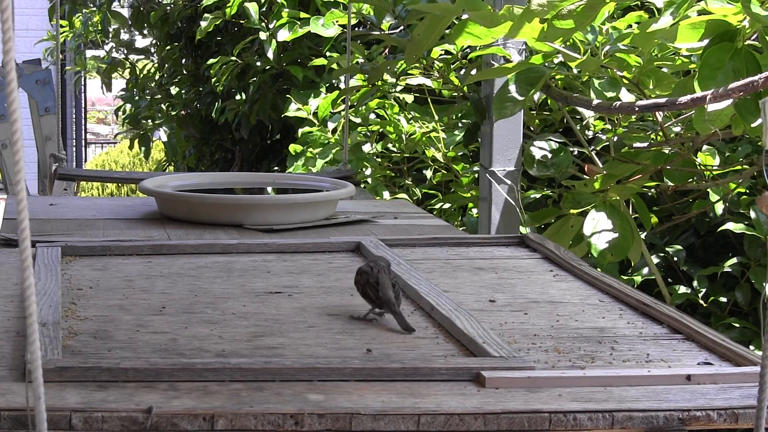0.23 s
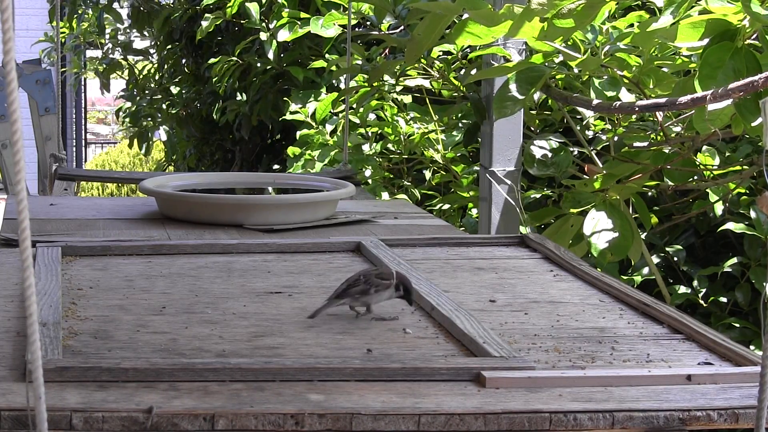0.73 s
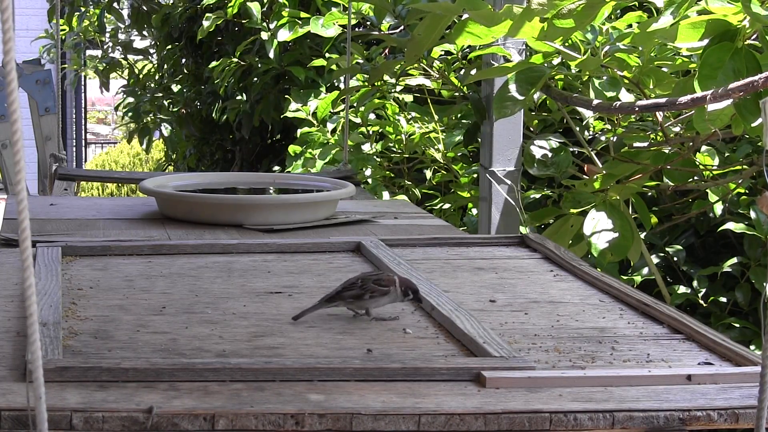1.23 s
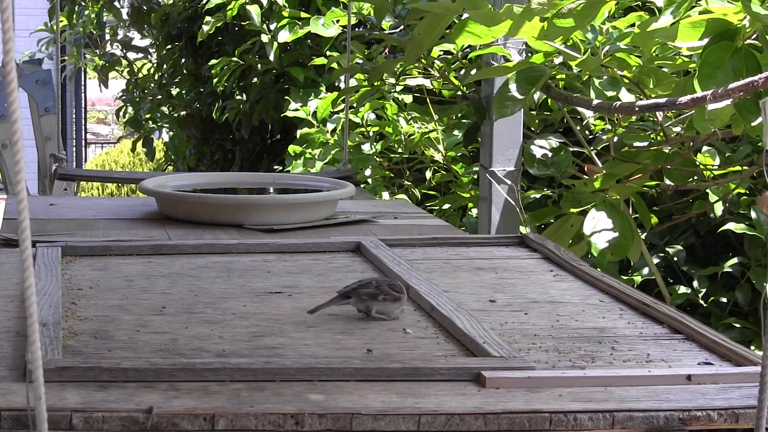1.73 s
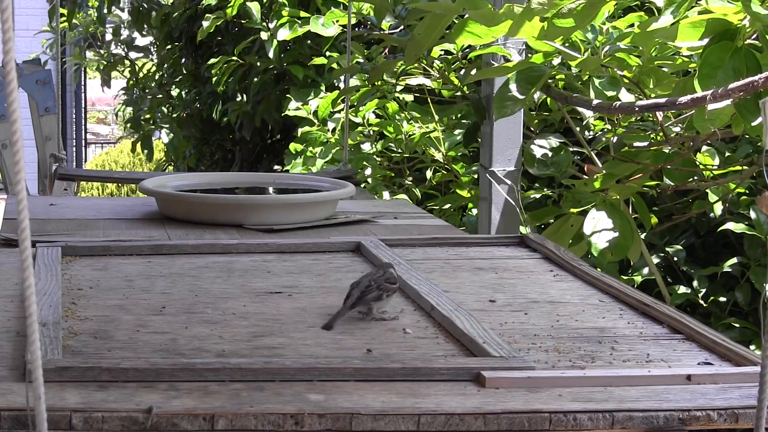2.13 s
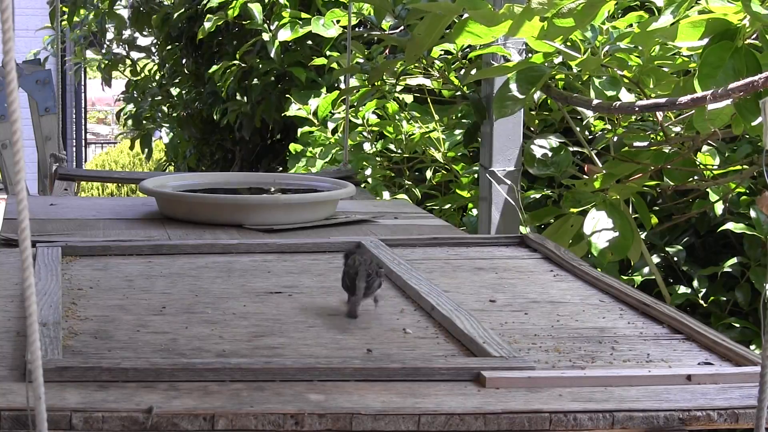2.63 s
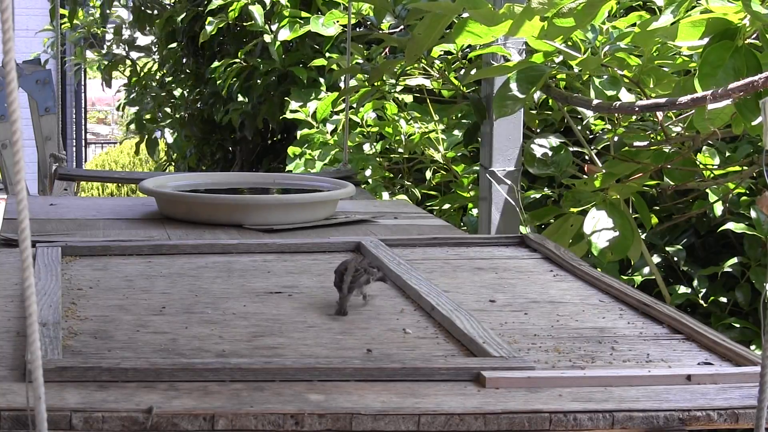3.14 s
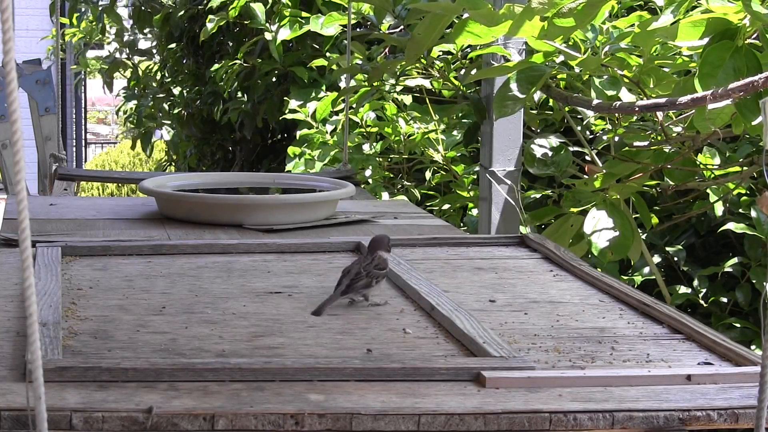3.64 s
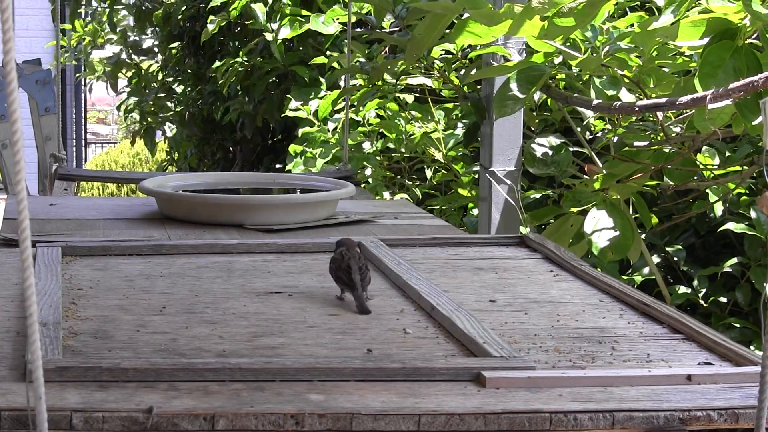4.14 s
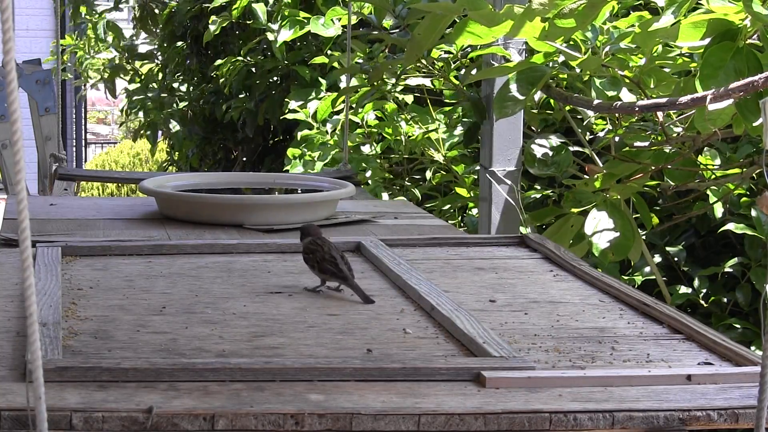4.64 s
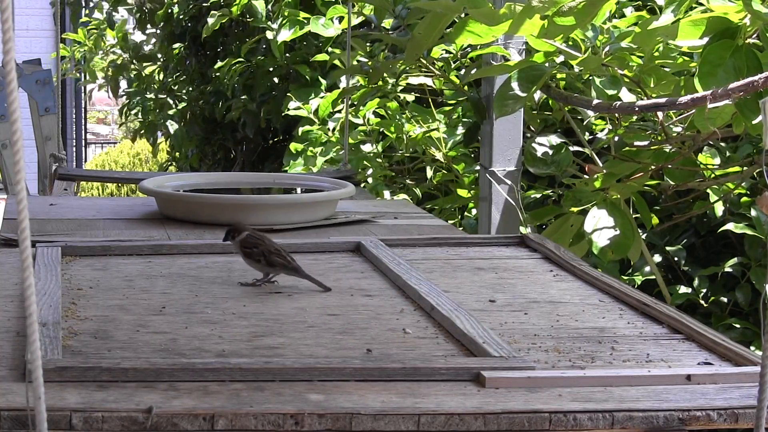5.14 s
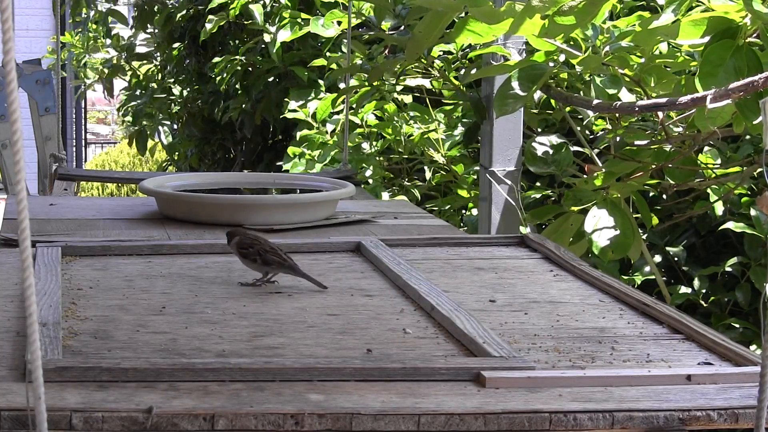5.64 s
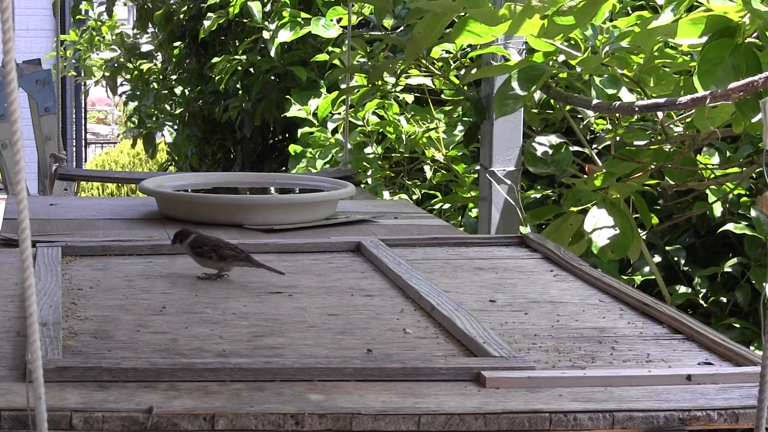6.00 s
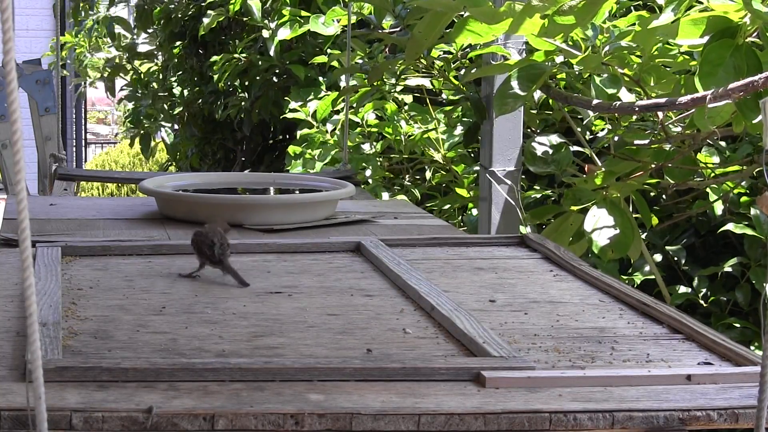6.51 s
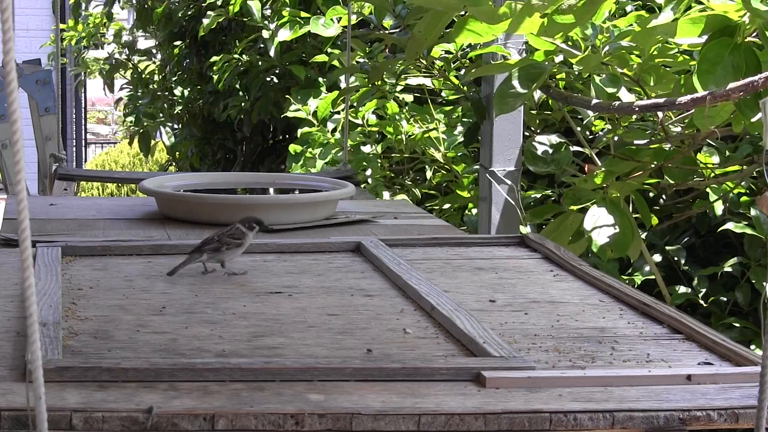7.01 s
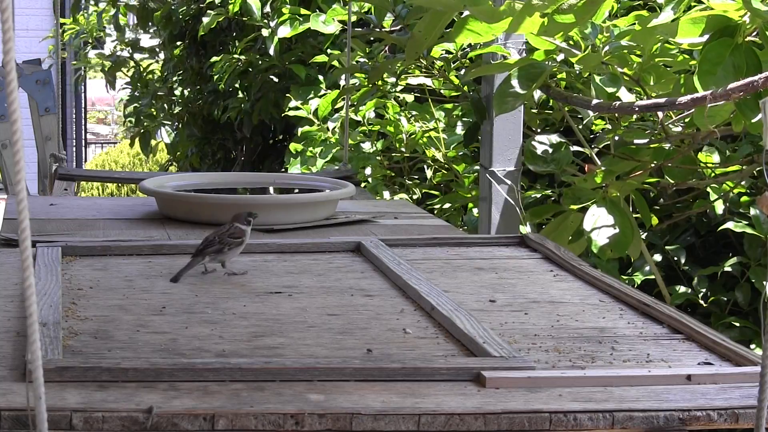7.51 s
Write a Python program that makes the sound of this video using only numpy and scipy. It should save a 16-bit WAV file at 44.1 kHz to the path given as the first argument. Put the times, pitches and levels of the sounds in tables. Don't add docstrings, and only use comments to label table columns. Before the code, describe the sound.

A sparrow close to the microphone chirps six times, alternating a longer raspy chirp with a shorter two-toned one, the first by far the loudest. Its claws and beak tick softly on a wooden board between calls. Fainter sparrows answer from a hedge and distant yards, with a brief scrape further off. Close walls give a short slap of echo over quiet town hum and leaf hiss.

```python
import sys
import numpy as np
from scipy import signal
from scipy.fft import rfft, irfft
from scipy.io import wavfile
from scipy.ndimage import uniform_filter1d, map_coordinates

SR = 44100
rng = np.random.default_rng(int(sys.argv[2]) if len(sys.argv) > 2 else 0)


def invert_db(level):
    return 10 ** (np.asarray(level, dtype=float) / 20)


def store_pcm(level_fs):
    pcm = np.round(np.clip(level_fs, -1, 1) * 32767).astype(np.int16)
    wavfile.write(sys.argv[1], SR, np.atleast_2d(pcm).T)


N = 342216

# (pitch [Hz], level [dB])
RUMBLE_COLOUR = [(20, -35), (34, -16), (48, -2), (62, -4.5), (80, -2.5), (130, -1.5), (200, -4.5),
                 (400, -38)]
# (time [s], level [dB])
ROAD_LEVEL = [
    (0, -63.5),
    (1.3, -64.5),
    (1.7, -62.5),
    (2.3, -63),
    (3.5, -63),
    (4.8, -61),
    (5.7, -59.5),
    (6.85, -58),
    (7.76, -58),
]
# (pitch [Hz], level [dB])
ROAD_COLOUR = [(120, -13.5), (280, 1), (400, -4.5), (800, -5), (1500, -10.5), (2100, -17.5), (4000, -32)]
# (time [s], level [dB])
BREEZE_LEVEL = [
    (0, -65.5),
    (.37, -71),
    (3.5, -70.5),
    (4.3, -66),
    (5.1, -65),
    (6, -67.5),
    (7.76, -66),
]
# (pitch [Hz], level [dB])
LEAF_COLOUR = [(800, -14.5), (2000, 1.5), (4000, 1), (8000, -5.5), (13000, -11), (16000, -17)]
# (pitch [Hz], likeness [0 to 1])
LIKENESS = [(60, 1), (180, 0.87), (550, 0.62), (1650, 0.72), (4970, 0.63), (15000, 0.59)]

# (pitch [Hz], time to fall 60 dB [s])
WALL_DECAY = [(300, 0.091), (1500, 0.21), (3500, 0.15), (6000, 0.2), (12000, 0.089)]
# (pitch [Hz], time to fall 60 dB [s])
YARD_DECAY = [(1000, .3), (4000, .48), (8000, 0.24)]
# (delay [s], level [dB])
FENCE_ECHOES = [(.0195, -14), (0.0077, -15.5)]

# (time [s], knock [dB], thud above the knock [dB], knock pitch [Hz])
CLAW_HOPS = [(.21, -53.5, -15.5, 2560), (.242, -55, -4, 937), (.803, -59, -9, 1770),
             (.821, -57, -18.5, 1045), (2.284, -48.5, -7.5, 1640), (3.977, -44.5, -9, 2588),
             (4.347, -41, 0, 2000), (4.604, -58, -15, 1110), (4.967, -39, -1, 1442), (4.975, -45, -9, 1170),
             (5.926, -48, 1, 1060), (6.38, -41, -4, 1390), (7.42, -52.5, -7.5, 830)]
# (time [s], knock [dB], thud above the knock [dB], knock pitch [Hz])
BEAK_PECKS = [(.855, -47.5, -12, 966), (1.562, -41.5, -15.5, 1080), (1.577, -43, -12, 840),
              (1.602, -42, -10, 1050), (1.765, -46.5, -7.5, 991), (3.016, -54.5, -18, 1240),
              (3.04, -42.5, -11, 1590), (3.334, -46.5, 1.5, 1700), (4.571, -55.5, -10, 1500),
              (5.219, -43.5, -7.5, 820), (5.993, -39.5, -3.5, 1180), (6.898, -41.5, 6.5, 2160)]
# (pitch [Hz], level [dB], time to fall 60 dB [s])
BOARD_RING = [(255.5, -0.5, 0.095), (298.4, -6, 0.17), (434, -6, 0.1)]
# (multiple of the knock pitch, level per Hz [dB])
KNOCK_COLOUR = [(.35, -23.5), (.7, -6.5), (1.02, -2), (1.5, -6.5), (2.4, -11.5), (4.5, -28)]
# (pitch [Hz], level per Hz [dB])
SCRATCH_COLOUR = [(2000, -3.5), (4000, 5.5), (8000, 2), (14000, -3.5), (16000, -6.5)]

# (start [ms], from [Hz], to [Hz], peak [dB], share of the stroke spent gliding [0 to 1])
LONG_STROKES = [(-10, 8100, 6800, -43, .7), (12.5, 4000, 4400, -17, .7), (16.5, 5200, 6100, -11, .8),
                (24.5, 6200, 6000, -10.5, .6), (28.5, 5800, 4250, -4, 0.8), (39, 5000, 3350, -8.5, .45),
                (48.5, 3450, 3500, -13, .5), (57.5, 3450, 4400, -4, .85), (65.5, 5000, 3350, 0.5, .65),
                (77.5, 4200, 2050, -3, .7), (84, 2100, 3200, -4, 0.7514), (96, 3100, 2100, -5, .8)]
# (start [ms], from [Hz], to [Hz], peak [dB], share of the stroke spent gliding [0 to 1])
SHORT_STROKES_A = [(15, 1850, 2300, -13, .6), (18.5, 2300, 4100, -14, .9), (27.06, 4100, 3900, -6, 0.91),
                   (34.01, 3900, 2250, -7, .9), (39, 2500, 3900, -2.5, .65), (49.02, 3800, 4200, -2.5, .7),
                   (54.17, 3700, 3150, -5, .9), (59, 2900, 3950, -5, .8), (63.5, 3950, 3400, -5, .7),
                   (66.9, 3650, 3720, -2.5, .5), (73.5, 3900, 1750, 0.5, .85)]
# (start [ms], from [Hz], to [Hz], peak [dB], share of the stroke spent gliding [0 to 1])
SHORT_STROKES_B = [(14.94, 3200, 3500, -18.5, .7), (20.015, 3500, 4900, -15.5, 0.599),
                   (30.32, 4500, 4850, -11.5, 0.57), (39.66, 3600, 4400, -2, 0.99),
                   (47.1, 4400, 3500, -3.5, .85), (54.9, 3500, 2750, -2.5, .8), (66.5, 2700, 1750, -5, .9),
                   (75, 1750, 1300, -6, .8)]
# (time [s], then effort at four even moments [dB])
LONG_CHIRPS = [
    (.34, -3, -9, -10, -8),
    (3.786, -15, -14, -13.5, -15),
    (6.528, -11, -13.5, -13.5, -14),
]
# (time [s], then effort at four even moments [dB])
SHORT_CHIRPS = [
    (2.655, -12.5, -16, -16.5, -21),
    (5.27, -20, -21.5, -20, -20.5),
    (7.6519, -11.5, -13, -15, -20.5),
]
# (time [s], left over right [dB], overtones [dB], low notes [dB], wall echo [dB])
PERCH_TURNS = [
    (.34, 3.5, 0, -2, -9),
    (2.655, 2.5, 0.5, -2, -4.5),
    (3.7875, 1.9, 4, -1, -4),
    (5.2705, 2.47, 5, -4.5, -4),
    (6.528, 2, 4, -2.5, -1.5),
    (7.6525, 2.62, 1.5, -2.5, -5),
]
# (pitch [Hz], level [dB])
HALF_PITCH = [(2000, -28), (2500, -16.5), (3000, -19), (3400, -39), (4500, -21), (5500, -45.5)]
# (pitch [Hz], level [dB])
THROAT_PASS = [(1300, -18.5), (2100, -15), (2800, -3), (3500, 0.5), (4500, -0.5), (6200, -4.5)]
# (pitch [Hz], level per Hz [dB])
RASP_COLOUR = [(1500, -24), (3000, -8), (5000, 2.5), (6500, -1), (8000, -7), (10000, -10.5), (13000, -19),
               (16000, -29)]

# (time [s], length [s], from [Hz], to [Hz], level [dB])
FAR_GLIDES = [
    (0, 0.0247, 5580, 6330, -4),
    (0.01, .028, 6000, 4310, -3),
    (0.029, .032, 4500, 3480, 0.5),
    (.056, .04, 3450, 4400, -2.5),
]
# (time [s], level [dB], length factor)
FAR_CHIRPS = [
    (1.588, -47, .9),
    (3.968, -48.5, 1.15),
]
# (time [s], length [s], from [Hz], to [Hz], level [dB])
FAINT_GLIDES = [
    (2.086, .039, 3700, 3300, -62.5),
    (2.153, .04, 2660, 2730, -65),
    (2.247, .05, 3980, 3600, -65.5),
    (2.29, .04, 3700, 3650, -73),
]
# (time [s], length [s], from [Hz], to [Hz], level [dB])
HEDGE_GLIDES = [(4.72, .02, 6500, 7000, -58), (5.592, 0.035, 3650, 2380, -50),
                (5.612, 0.0435, 2260, 2590, -54), (5.645, .028, 2513, 3332, -49),
                (5.65, 0.02685, 3270, 4123, -50), (5.65, .025, 1469, 2000, -54),
                (7.042, 0.0266, 3156, 2384, -51.5), (7.065, 0.036, 2414, 3300, -53),
                (7.092, 0.029, 3200, 3490, -51.5), (7.096, 0.022, 3886, 4100, -60),
                (7.418, 0.024, 7600, 7300, -56)]

# (pitch [Hz], level per Hz [dB])
SCRAPE_COLOUR = [(250, -4.5), (500, -1.5), (1100, -10), (1800, -5), (2400, -11.5), (3200, -19),
                 (6000, -36.5)]
# (time [s], firing rate [Hz], level [dB])
CAR_PASS = [
    (2.6, 31.8, -86),
    (2.9, 35.17, -69.5),
    (3.15, 43.11, -55.5),
    (3.35, 49.08, -65),
    (3.45, 40.9, -68),
    (3.8, 39, -56),
    (4.3, 39, -70),
    (4.6, 37.6, -60.5),
    (5, 37.58, -101),
]
# (multiple of the firing rate, level [dB])
ENGINE_ORDERS = [(2, -1.5), (3, -1.5), (4, -14)]

LONG_END_MS, SHORT_END_MS = 106.7, 91
# start, full, fading, end [ms], level [dB]
LONG_AIR, SHORT_AIR = (-16, 30, 95, 112.5, -34), (8.5, 20, 78, 92, -30)


def unit(x):
    return x / np.sqrt(np.mean(x ** 2) + 1e-20)


def along(points, hz):
    f, v = np.transpose(points)
    return np.interp(np.log(hz + 1), np.log(f + 1), v)


def curves(rows, t):
    s, *cols = np.transpose(rows)
    return [np.interp(t, s, c, left=c[0], right=c[-1]) for c in cols]


def wobble(rate, size):
    knots = rng.standard_normal(int(size * rate / SR) + 4)
    return map_coordinates(knots, [np.arange(size) * rate / SR])


def noise(spectrum, size, alike=None):
    hz = np.fft.rfftfreq(size, 1 / SR)
    colour = invert_db(along(spectrum, hz) - 60 * (hz < spectrum[0][0] / 2))
    a, b = rfft(rng.standard_normal((2, size))) * colour
    if alike is None:
        return unit(irfft(a, size))
    turn = np.arccos(np.clip(along(alike, hz), -1, 1)) / 2
    left = np.cos(turn) * a + np.sin(turn) * b
    right = np.cos(turn) * a - np.sin(turn) * b
    return unit(irfft([left, right], size))


def add(out, s, x):
    part = out[:, round(s * SR):][:, :x.shape[1]]
    part += x[:, :part.shape[1]]


def echoed(x, decay, delay_s, alike):
    hz, t, z = signal.stft(rng.standard_normal((2, SR // 2)), SR, nperseg=128)
    fading = z * invert_db(-60 * t / along(decay, hz)[:, None])
    a, b = signal.istft(fading, SR, nperseg=128)[1]
    side = np.sqrt(np.clip((1 - alike) / (1 + alike), 0, 1))
    tail = np.array([a + side * b, a - side * b])
    tail = tail / np.sqrt(np.sum(tail ** 2) / 2)
    tail = np.pad(tail, ((0, 0), (round(delay_s * SR), 0)))
    return signal.fftconvolve(x[None], tail, axes=1)


def voice(hz, db, half_db, flutter, shiver_db):
    smooth_hz, smooth_db = uniform_filter1d(hz, size=45), uniform_filter1d(db, size=45)
    turn = 2 * np.pi * np.cumsum(smooth_hz * (1 + flutter * wobble(700, len(hz)))) / SR
    tone = np.sin(turn) + invert_db(half_db) * np.sin(turn / 2)
    return invert_db(smooth_db + shiver_db * wobble(450, len(hz))) * tone


def town():
    t = np.arange(N) / SR
    (road_db,), (leaf_db,) = curves(ROAD_LEVEL, t), curves(BREEZE_LEVEL, t)
    pass_s, pass_lasts_s = 3.6, 0.4
    rumble_db = -61 + 2.5 * np.exp(-((t - pass_s) / pass_lasts_s) ** 2)
    rumble = invert_db(rumble_db + 0.81 * wobble(5, N)) * noise(RUMBLE_COLOUR, N, LIKENESS)
    road = invert_db(road_db + 3 + 0.68 * wobble(7, N)) * noise(ROAD_COLOUR, N, LIKENESS)
    leaves = invert_db(leaf_db + 5.5 + 0.393 * wobble(5, N)) * noise(LEAF_COLOUR, N, LIKENESS)
    return (rumble + road + leaves) * invert_db([[-.4], [.4]])


def motor_whine():
    t = np.arange(N) / SR
    stops_s, fade_db_per_s = 4.9, 80
    db = -83 - fade_db_per_s * np.clip(t - stops_s, 0, None)
    return invert_db(db + 1.5 * wobble(12, N)) * np.sin(2 * np.pi * 12769 * t)


def taps():
    out, t = np.zeros((2, N)), np.arange(SR // 6) / SR
    claw_db, beak_db = -54.5, -61.5
    contacts = [(*row, claw_db) for row in CLAW_HOPS] + [(*row, beak_db) for row in BEAK_PECKS]
    for s, db, thud_db, knock_hz, scratch_db in contacts:
        scratch = invert_db(scratch_db - db - 60 * t / 0.06) * noise(SCRATCH_COLOUR, len(t))
        knock = invert_db(-4.5 - 60 * t / .06) * noise(np.multiply(KNOCK_COLOUR, (knock_hz, 1)), len(t))
        ring = sum(invert_db(level + rng.normal(0, 0.86) - 60 * t / t60) * np.sin(2 * np.pi * hz * t)
                   for hz, level, t60 in BOARD_RING)
        thud = invert_db(thud_db) * (1 - np.exp(-t / .004)) * ring
        x = invert_db(db - 1) * (1 - np.exp(-t / .0007)) * (scratch + knock + thud)
        add(out, s, np.array([x, x]))
        add(out, s, invert_db(-5.0) * echoed(x, WALL_DECAY, delay_s=0.0035, alike=0.74))
    return out


def strokes(rows, end_ms, ms):
    bend = .9
    dip_db, break_db_per_octave, edge_db = 6, 40, 22
    start, from_hz, to_hz, db, share = np.transpose(rows)
    edges = np.append(start, end_ms)
    k = np.clip(np.searchsorted(edges, ms) - 1, 0, len(start) - 1)
    u = np.clip((ms - start[k]) / np.diff(edges)[k], 0, 1)
    peak = np.clip(share, .05, .95)[k]
    glide = (1 - np.cos(np.pi * np.minimum(u / peak, 1) ** bend)) / 2
    hz = from_hz[k] + (to_hz - from_hz)[k] * glide
    jump_octaves = np.abs(np.log2(from_hz[1:] / to_hz[:-1]))
    joints = (db[1:] + db[:-1]) / 2 - dip_db - break_db_per_octave * jump_octaves
    lows = np.r_[db[0] - edge_db, joints, db[-1] - edge_db]
    rise = (1 - u / peak) ** 2 * (lows[k] - db[k])
    fall = ((u - peak) / (1 - peak)) ** 2 * (lows[k + 1] - db[k])
    return hz, db[k] + np.where(u < peak, rise, fall) + along(THROAT_PASS, hz)


def long_chirp(ms):
    hz, db = strokes(LONG_STROKES, LONG_END_MS, ms)
    return voice(hz, db, along(HALF_PITCH, hz) + 5 * wobble(150, len(ms)), flutter=.018, shiver_db=2.6)


def short_chirp(ms):
    hz_a, db_a = strokes(SHORT_STROKES_A, SHORT_END_MS, ms)
    hz_b, db_b = strokes(SHORT_STROKES_B, SHORT_END_MS, ms)
    half_a = voice(hz_a, db_a, -60, flutter=.025, shiver_db=2.2)
    half_b = voice(hz_b, db_b, -60, flutter=.025, shiver_db=2.2)
    return half_a + half_b


def breath(air, ms):
    start, full, fading, end, db = air
    hiss = start + 0.17 * (full - start)
    return db - np.interp(ms, [start, hiss, full, fading, end], [45, 19, 0, 5, 27])


def overtones(x):
    swing = np.abs(signal.hilbert(x))
    square = x * x / (uniform_filter1d(swing, size=300) + 1e-4) * invert_db(5 * wobble(900, len(x)))
    return signal.sosfilt(signal.butter(4, 5000, "high", fs=SR, output="sos"), square)


def shaded(x, low_db):
    hz = np.fft.rfftfreq(len(x), 1 / SR)
    return irfft(rfft(x) * invert_db(low_db * np.clip((3300 - hz) / 600, 0, 1)), len(x))


def sparrow():
    lead_s = .015
    out, ms = np.zeros((2, N)), 1000 * (np.arange(SR // 7) / SR - lead_s)
    kinds = ((long_chirp, LONG_STROKES[0][0], LONG_END_MS, LONG_CHIRPS, LONG_AIR, -36),
             (short_chirp, SHORT_STROKES_A[0][0], SHORT_END_MS, SHORT_CHIRPS, SHORT_AIR, -30))
    for chirp, begin, end, calls, air, over_db in kinds:
        for s, *effort_db in calls:
            x = chirp(ms)
            pan_db, aim_db, low_db, echo_db = curves(PERCH_TURNS, s)
            rasp_db = aim_db + breath(air, ms) + 3.7 * wobble(300, len(ms))
            rasp = invert_db(rasp_db) * noise(RASP_COLOUR, len(ms))
            sounding = (ms > begin) & (ms < end)
            x = sounding * (x + invert_db(over_db + aim_db) * overtones(x)) + (ms < air[-2]) * rasp
            effort = invert_db(np.interp(ms, np.linspace(15, end - 12, len(effort_db)), effort_db))
            x = shaded(x, low_db) * effort
            s = s - lead_s
            for delay, db in FENCE_ECHOES:
                bounce = invert_db(db + rng.normal(0, 1.0, (2, 1))) * x
                add(out, s + delay + rng.normal(0, 0.00046), bounce)
            add(out, s, x * invert_db([[pan_db / 2], [-pan_db / 2]]))
            add(out, s, invert_db(echo_db) * echoed(x, WALL_DECAY, delay_s=.002, alike=0.88))
            add(out, s, invert_db(echo_db - 21.5) * echoed(x, YARD_DECAY, delay_s=0.023, alike=.6))
    return out


def far_sparrows():
    out = np.zeros((2, N))
    yards = [(s + slow * after, slow * length, from_hz, to_hz, call_db + db)
             for s, call_db, slow in FAR_CHIRPS
             for after, length, from_hz, to_hz, db in FAR_GLIDES]
    yards = yards + list(FAINT_GLIDES)
    places = ((yards, -12, 1.5, .1), (HEDGE_GLIDES, -3.5, -4.5, .075))
    for glides, direct_db, echo_db, flutter in places:
        for s, length, from_hz, to_hz, db in glides:
            u = np.linspace(0, 1, round(length * SR))
            hz = from_hz + (to_hz - from_hz) * u
            x = np.sin(np.pi * u) * voice(hz, db + 0 * u, -30, flutter=flutter, shiver_db=4.5)
            add(out, s, invert_db(direct_db) * np.array([x, x]))
            add(out, s, invert_db(echo_db) * echoed(x, YARD_DECAY, delay_s=0.0035, alike=0.77))
    return out


def scrape():
    t = np.arange(N) / SR
    start_s, attack_s, hold_s, release_s = 2.37, .03, .18, .06
    corners = start_s + np.cumsum([0, attack_s, hold_s, release_s])
    inside = (t > corners[0]) & (t < corners[-1])
    db = -51 - np.interp(t, corners, [20, 0, 5.5, 9])
    jerks = unit(invert_db(1.4 * wobble(98, N)))
    return inside * invert_db(db) * jerks * noise(SCRAPE_COLOUR, N, LIKENESS)


def car():
    t = np.arange(N) / SR
    hz, db = curves(CAR_PASS, t)
    turn = 2 * np.pi * np.cumsum(hz * (1 + 0.022 * wobble(14, N))) / SR
    return sum(invert_db(db + level + 3 * wobble(8, N)) * np.sin(round(k) * turn) for k, level in ENGINE_ORDERS)


def scene():
    return town() + motor_whine() + taps() + sparrow() + far_sparrows() + scrape() + car()


def band_limit(x):
    return signal.sosfilt(signal.butter(12, 15990, fs=SR, output="sos"), x)


def record(dry):
    top_hz = 15740
    kept = irfft(rfft(dry) * (np.fft.rfftfreq(N, 1 / SR) < top_hz), N)
    return band_limit(kept)


dry = scene()
out = record(dry)
store_pcm(out)
```